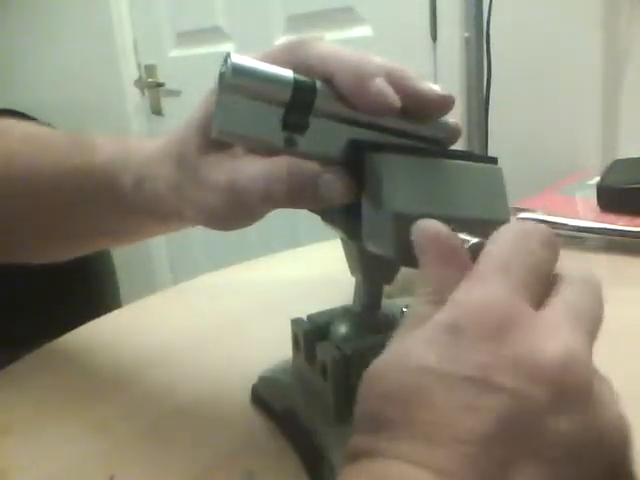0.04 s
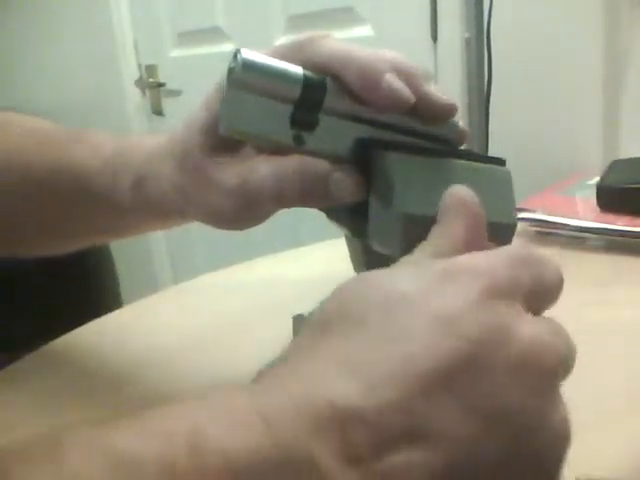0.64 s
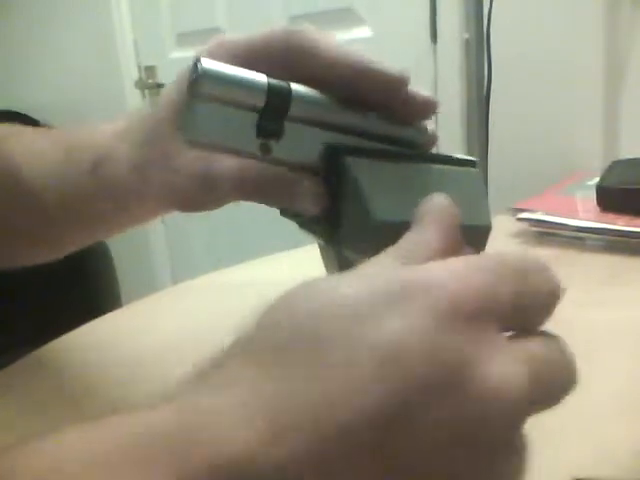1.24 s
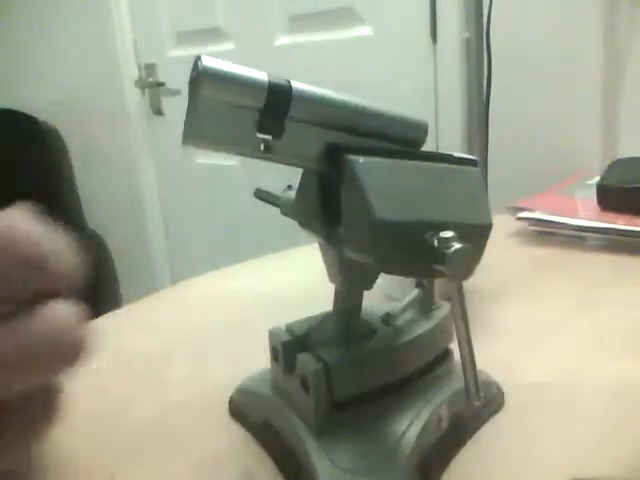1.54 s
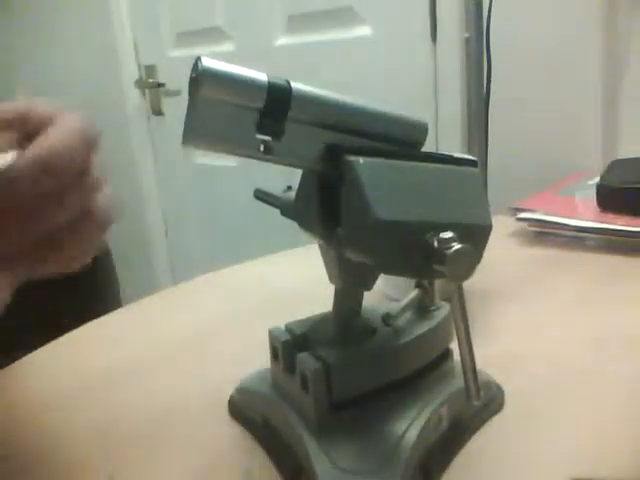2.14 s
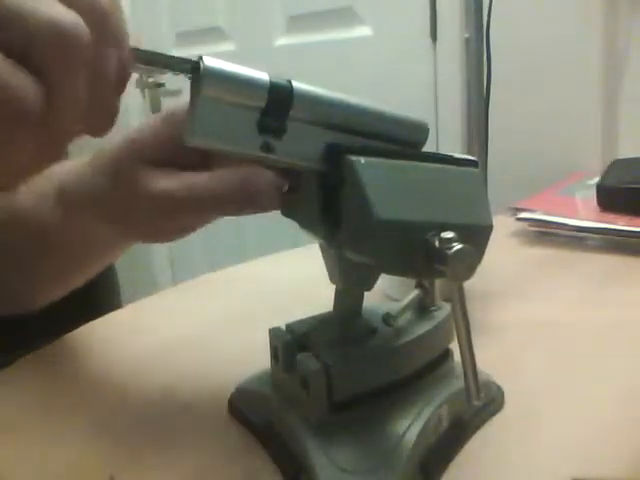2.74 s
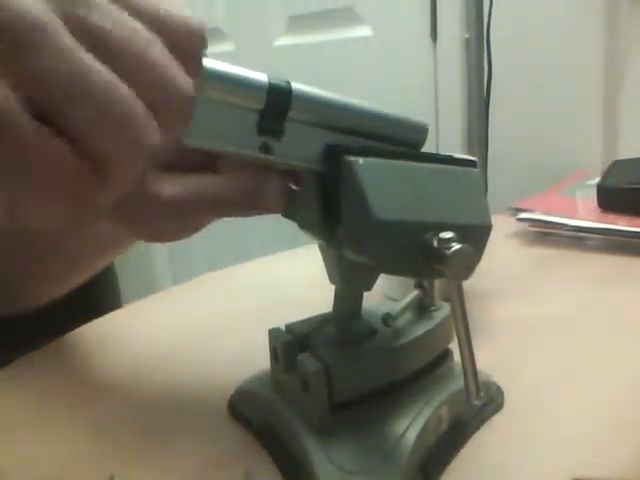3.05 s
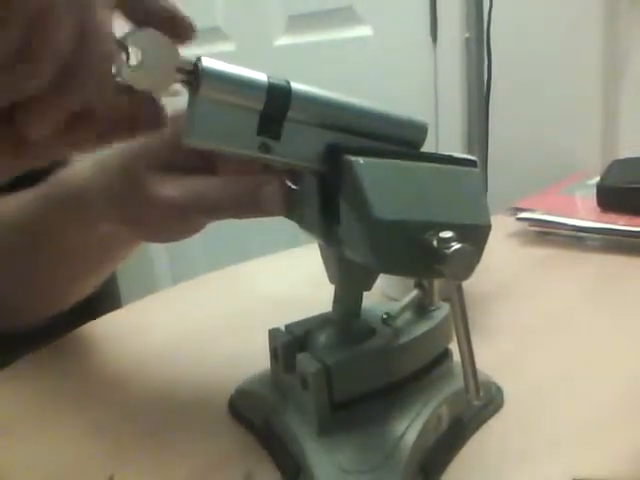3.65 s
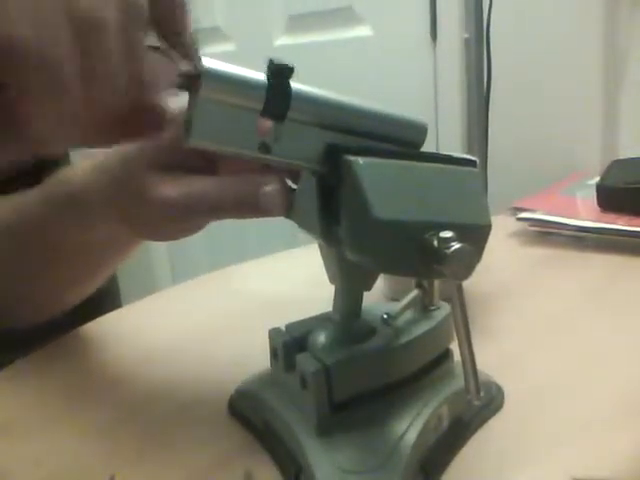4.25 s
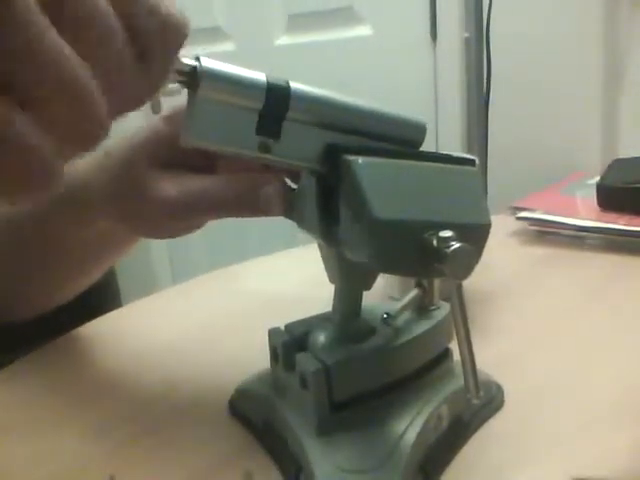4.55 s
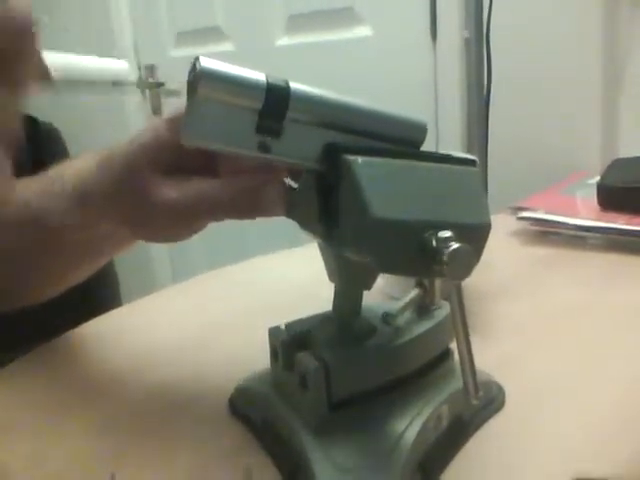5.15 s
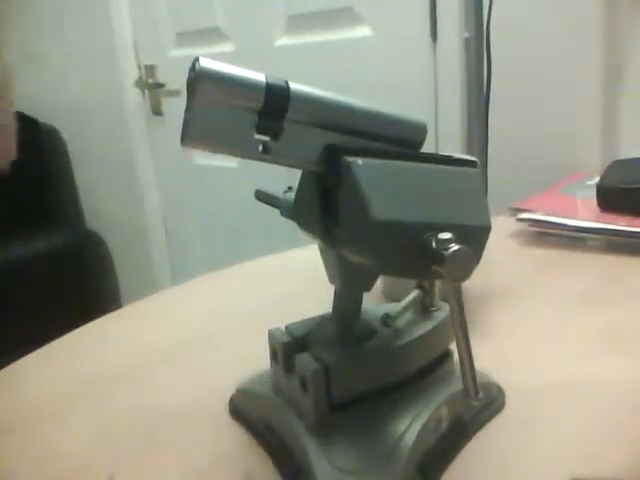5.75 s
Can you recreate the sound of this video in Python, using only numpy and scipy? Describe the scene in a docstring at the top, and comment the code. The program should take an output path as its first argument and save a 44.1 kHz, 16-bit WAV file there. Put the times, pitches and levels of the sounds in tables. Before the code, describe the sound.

A vise screw squeaks twice, a key clicks and turns in a metal lock, then clatters onto a wooden desk.

```python
"""A vise screw rasps faintly, then squeals twice by stick-slip friction as it clamps a cylinder lock.
A key slides in, turns against the pins and is drawn out; the impacts excite the modes of lock and vise.
Dropped on the wooden desk, the key bounces, drums the top and rings in its own modes, and a metal
tool scrapes over the wood. The small, quiet room adds a short reverberation."""
import sys
import numpy as np
from scipy import signal
from scipy.fft import rfft, irfft
from scipy.io import wavfile
from scipy.ndimage import uniform_filter1d

SR = 44100
rng = np.random.default_rng(int(sys.argv[2]) if len(sys.argv) > 2 else 0)


def wav_record(signal):
    """Record a signal, one row per channel, as 16-bit PCM in the file named by sys.argv[1]."""
    frames = np.transpose(np.atleast_2d(signal))
    bounded = np.clip(frames, -1, 1)
    # unit amplitude maps onto the largest positive 16-bit level
    quanta = np.round(bounded * 32767).astype(np.int16)
    wavfile.write(sys.argv[1], SR, quanta)


N = 264996
T = np.arange(N) / SR
IMPACT_T = T[:SR // 3]  # time axis of one impact [s]
TOP_HZ = 15850

# modes of the vise: (frequency [Hz], bandwidth [Hz], gain [dB])
VISE_MODES = [(237.4, 7.3, 0.5), (480, 142, -4), (833, 22, -7.5), (1080, 28, -11), (1575, 184, -8),
              (2330, 200, -7), (2725, 59, -9), (3310, 30, 2), (3860, 340, -8.5)]
# modes of the desk top: (frequency [Hz], bandwidth [Hz], gain [dB])
DESK_MODES = [(262, 25, 0.5), (561, 88, -1.5), (816, 32, 0.5), (1104, 37, 1), (1590, 76, -1.5),
              (1718, 28, -2), (2230, 58, -9), (2540, 160, -6.5), (2830, 120, -3), (2980, 45, -14),
              (3280, 37, -4), (3490, 16, -12), (4310, 32, -7), (4760, 25, -27)]
# modes of the key, some in close pairs: (frequency [Hz])
KEY_MODES_HZ = [5141, 7110, 8137, 8312, 11390, 11435, 12695, 12775, 15570]


def undb(db):
    """Amplitude ratio: a factor of ten for every 20 dB."""
    return 10 ** (np.asarray(db) / 20)


def unit(x):
    """Normalisation to rms 1."""
    return x / np.sqrt(np.mean(x ** 2))


def unit_peak(x, size=256):
    """Normalisation of the loudest few milliseconds to rms 1."""
    return x / np.sqrt(uniform_filter1d(x ** 2, size, mode="constant").max())


def fade(t, t60):
    """Damping: exponential decay by 60 dB in t60 seconds."""
    return np.exp(-np.log(1000) * t / t60)


def add(out, start, x):
    """Superposition of x on out from a start time [s]."""
    i = max(int(start * SR), 0)
    out[i:i + len(x)] += x[:max(N - i, 0)]


def band(x, lo_hz, hi_hz, order=2):
    """Causal band-pass filtering."""
    sos = signal.butter(order, [lo_hz, min(hi_hz, .48 * SR)], "band", fs=SR, output="sos")
    return signal.sosfilt(sos, x)


def colour(x, points):
    """Spectral shaping along points of (frequency [Hz], gain [dB])."""
    hz, db = np.transpose(points)
    bins_hz = np.maximum(np.fft.rfftfreq(len(x), 1 / SR), 1)
    return irfft(rfft(x) * undb(np.interp(np.log(bins_hz), np.log(hz), db)), len(x))


def wobble(rate_hz):
    """Random modulation: low-passed noise of rms 1."""
    size = max(int(SR / rate_hz), 2)
    return unit(uniform_filter1d(uniform_filter1d(rng.standard_normal(N), size), size))


def body(x, modes, direct, scatter_db=0):
    """Modal response: parallel resonators plus a direct share; scatter mimics a varying strike point."""
    weights = undb(scatter_db * rng.standard_normal(len(modes)))
    return direct * x + sum(weight * undb(db) * signal.lfilter(*signal.iirpeak(hz, hz / width, SR), x)
                            for weight, (hz, width, db) in zip(weights, modes))


def contact(t60, rise_s=.00043, spread_db=4.5, grain_samples=32):
    """Impact of rough faces: a decaying burst of uneven micro-impacts."""
    n = len(IMPACT_T)
    sizes = np.repeat(undb(spread_db * rng.standard_normal(n // grain_samples + 1)), grain_samples)[:n]
    return rng.standard_normal(n) * sizes * fade(IMPACT_T, t60) * (1 - np.exp(-IMPACT_T / rise_s))


def grit(n, rate_hz, spread_db):
    """Friction as shot noise: tiny random slips of uneven size."""
    slips = (rng.random(n) < rate_hz / SR) * rng.standard_normal(n)
    return slips * undb(spread_db * np.minimum(rng.exponential(size=n), 4))


def background():
    """Noise floor: room murmur, microphone hiss, electronic whine and, at first, skin on the handle."""
    # spectrum of murmur and hiss: (frequency [Hz], relative density [dB])
    floor_spectrum = [(15, -41), (25, -4.5), (253, -5), (378, -6.5), (421, -5), (762, -12.5), (1140, -12),
                      (5280, -17.5), (12800, -20), (15500, -21.5)]
    hiss = unit(colour(rng.standard_normal(N), floor_spectrum)) * undb(-55.96)
    whine = unit(band(rng.standard_normal(N), 12650, 12750)) * undb(-71)
    skin = unit(band(grit(N, 2500, 1.5), 110, 700, order=1))
    return hiss + whine + skin * undb(np.interp(T, [.5, 1.3, 1.6], [-56, -62, -90]))


def room(x, wet_db=-11, t60=.25, first_echo_s=.008):
    """Reverberation: reflections from close walls merge into a short, dull tail."""
    # spectrum of the tail: (frequency [Hz], gain [dB])
    tail_spectrum = [(60, -10), (250, -1), (1500, 0), (3000, 0), (6000, -5), (16000, -11)]
    t = T[:SR // 2]
    tail = colour(rng.standard_normal(len(t)), tail_spectrum) * fade(t, t60) * (t > first_echo_s)
    return x + undb(wet_db) * signal.fftconvolve(x, tail / np.sqrt(np.sum(tail ** 2)))[:N]


def rocking():
    """Low-frequency impacts: the vise rocks under the hands and its foot bumps the desk."""
    # bumps of the foot: (time [s], relative level [dB])
    bumps = [(2.878, -45), (3.318, -46.5), (3.791, -51), (4.678, -45), (4.823, -49), (4.863, -37.5),
             (4.93, -39.5), (4.988, -44.5)]
    out = np.zeros(N)
    for start, db in bumps:
        add(out, start, unit_peak(band(contact(t60=.11), 45, 200)) * undb(db + 4.5))
    return out


def taps():
    """Band-limited excitation: soft contacts sound only in the midrange."""
    # dull taps: (time [s], relative level [dB])
    touches = [(0.933, -40.5), (1.511, -38), (1.709, -39), (1.892, -46), (3.152, -43), (3.17, -43),
               (3.207, -38), (4.884, -32), (5.024, -25.5), (5.134, -39.5), (5.237, -35.5)]
    out = np.zeros(N)
    for start, db in touches:
        add(out, start, unit_peak(band(contact(t60=.011), 1000, 2000)) * undb(db - 7.5))
    return out


def rubbing():
    """Sliding friction of fingers and key on metal drives the modes of the vise."""
    # rubs: (start [s], duration [s], level [dB])
    rubs = [(.85, 0.065, -57), (1.022, 0.18, -51.8), (1.352, 0.042, -53), (2.49, 0.074, -56.5),
            (2.796, .14, -45), (3.131, .054, -50), (3.589, 0.13, -55), (3.727, 0.11, -49),
            (3.866, 0.1, -45), (4.348, .21, -51.5), (4.647, 0.025, -42)]
    # spectral envelope of a rub: (frequency [Hz], gain [dB])
    rub_spectrum = [(40, 0), (200, 4), (500, -3.5), (1700, -0.5), (2800, -3), (4500, -11), (9000, -13.5),
                    (16000, -26)]
    out = np.zeros(N)
    for start, duration, db in rubs:
        n = int(duration * SR)
        rub = unit(colour(body(grit(n, 3500, .46), VISE_MODES, direct=.57), rub_spectrum))
        add(out, start, rub * signal.windows.tukey(n, .4) * undb(db))
    return out


def dragged_tool(attack_s=.019, t60=1.2):
    """Sliding friction of metal on wood drives the desk's modes; each shove fades as it slows."""
    # shoves: (start [s], level [dB])
    shoves = [(5.645, -28.5), (5.911, -33)]
    # spectral envelope of the scrape: (frequency [Hz], gain [dB])
    scrape_spectrum = [(40, -54), (120, -0.5), (250, -2), (600, 0), (1600, -0.5), (2900, -1), (4000, -14.5),
                       (6500, -19), (16000, -39)]
    scrape = unit(colour(body(grit(N, 5000, 1), DESK_MODES, direct=.47), scrape_spectrum))
    envelope = np.zeros(N)
    for start, db in shoves:
        add(envelope, start, undb(db) * np.minimum(T / attack_s, 1) * fade(T, t60))
    return scrape * envelope


def screw_groan(groan_db=-56, rasp_db=-58):
    """Friction in the freely turning thread: a faint harmonic groan and a rasp of falling pitch."""
    slip_hz = np.interp(T, [.3, .52], [116, 126]) * (1 + .04 * wobble(14))
    phase = 2 * np.pi * np.cumsum(slip_hz) / SR
    groan = unit(sum(np.sin(k * phase) * wobble(24) for k in range(2, 5))) * undb(groan_db)
    rasp_hz = np.interp(T, [.15, .45], [3800, 3000])
    rasp = unit(wobble(620) * np.sin(2 * np.pi * np.cumsum(rasp_hz) / SR)) * undb(rasp_db)
    return groan * np.interp(T, [.5, .54], [1, 0]) + rasp * np.interp(T, [.1, .42, .47], [0, 1, 0])


def stick_slip(start, fastest, stall, end, top_hz, db, attack_s, rough):
    """Stick-slip rate [Hz], gain and roughness: a turn spins up, sags to the screw's pitch and stalls."""
    sing_hz, stall_hz = 2357, 800
    sag_s, release_s = .028, .0024
    spin_up_s, braking_s = .37 * max(fastest - start, 1 / SR), .62 * (end - stall)
    spin_up = 1 - np.exp(-np.maximum(T - start, 0) / spin_up_s)
    sag = np.exp(-(np.maximum(T - fastest, 0) / sag_s) ** 2)
    braking = np.exp(-(np.maximum(T - stall, 0) / braking_s) ** 2)
    speed = spin_up * braking
    hz = stall_hz + (sing_hz + (top_hz - sing_hz) * sag - stall_hz) * speed
    hz *= 1 + .14 * rough * wobble(108)
    onset_db = -31 * np.clip(1 - (T - start) / attack_s, 0, 1) ** 2
    slowing_db = -4 * (1 - speed)
    gate = (T > start) * np.exp(-np.maximum(T - end, 0) / release_s)
    return hz, undb(db + onset_db + slowing_db) * gate, np.clip(rough + .7 * (1 - speed), 0, 1)


def screw_squeal(jitter=.15, chatter_db=-4):
    """Self-excited oscillation: the dry screw sings while it slips fast and chatters as it slows."""
    # turns: (start [s], fastest [s], stall [s], end [s], top pitch [Hz], level [dB], attack [s],
    # base roughness [0-1])
    turns = [(0.433, 0.439, .511, .531, 2900, -28, 0.058, .06),
             (.57, .614, .654, .68, 2864, -28, 0.0024, .19)]
    # the vise radiates best near 2.4 kHz: (frequency [Hz], gain [dB])
    radiation = np.transpose([(800, -4.5), (1900, -3), (2370, 3.5), (2800, -3.5), (4700, -13),
                              (5400, -11.5), (7100, -26.5), (8000, -23), (11000, -38)])
    out = np.zeros(N)
    for turn in turns:
        hz, gain, rough = stick_slip(*turn)
        phase = 2 * np.pi * np.cumsum(hz * (1 + jitter * rough * wobble(750))) / SR
        tone = sum(np.sin(k * phase) * (k * hz < TOP_HZ) * undb(np.interp(k * hz, *radiation))
                   for k in range(1, 7))
        chatter = unit(band(body(grit(N, 4000, 1), VISE_MODES, direct=.49), 1270, 5700, order=3))
        flutter = undb(10 * np.minimum(rough, .3) * wobble(360))
        out += gain * (np.sqrt(2) * tone * (1 - rough / 2) * flutter + undb(chatter_db) * rough * chatter)
    return out


def click(bright_db, load_db):
    """Structure-borne sound: an impact ticks in the lock, clacks in the vise and thuds into the desk."""
    # modes of the lock cylinder: (frequency [Hz], bandwidth [Hz], gain [dB])
    cylinder_modes = [(3750, 400, 1), (5136, 90, -3), (7456, 90, -4), (8651, 80, 5), (11590, 140, 3)]
    clack = band(body(contact(.017, rise_s=.00042), VISE_MODES, direct=.25, scatter_db=7.5), 880, 2770)
    thud = band(body(contact(.04), VISE_MODES, direct=.52), 86, 860)
    tick = band(body(contact(.024, rise_s=.0086), cylinder_modes, direct=1), 3300, 8800)
    sizzle = band(body(contact(.015, rise_s=.0016), cylinder_modes, direct=.97), 7650, 14000)
    thud_db = -23.5 - .27 * bright_db + load_db  # a softer contact pushes longer and thuds more
    treble = unit_peak(tick) * undb(-10) + unit_peak(sizzle) * undb(-7.5)
    return unit_peak(clack) * undb(-9.5) + unit_peak(thud) * undb(thud_db) + treble * undb(bright_db)


def lock(tug_start=4.4, tug_end=5.05, tug_db=8.5):
    """Impacts of jaws, key and pins; tugging the key out loads the vise, so they thud harder."""
    # clicks: (time [s], level [dB], brightness [dB])
    clicks = [(.139, -42, -15), (.387, -41, -22), (.568, -18.5, -15.5), (1.258, -33, -3),
              (1.264, -27.5, -4.5), (1.271, -28.5, -1), (1.295, -33, -16), (2.549, -32.5, -6),
              (2.835, -37, 1), (2.861, -32, -1.5), (2.871, -27, -9.5), (2.878, -25.5, -9), (2.897, -30, 2),
              (2.914, -25.5, -14), (3.272, -26, -25), (3.296, -28.5, -10), (3.309, -28, -1.5),
              (3.314, -18, -4.5), (3.385, -33, -32), (3.586, -34, -12), (3.712, -31.5, -11),
              (3.736, -30.5, 3), (3.756, -26.5, 1.5), (3.781, -33, -4), (4.322, -30, -13),
              (4.35, -23.5, -10), (4.359, -29.5, -6.5), (4.462, -32, -12), (4.504, -33, -25),
              (4.535, -32.5, -20), (4.62, -33.5, -8.5), (4.655, -28.5, -32), (4.663, -26, -18),
              (4.667, -27, -1.5), (4.68, -29.5, -1.5), (4.772, -20, -13), (4.815, -27.5, 2.5),
              (4.819, -17, -5), (4.921, -27, -19), (4.926, -27, -5.5), (4.943, -33.5, -10),
              (4.956, -36, -1.5), (4.976, -32.5, -23), (4.999, -38.5, -3)]
    out = np.zeros(N)
    for start, db, bright_db in clicks:
        load_db = tug_db * (tug_start < start < tug_end)
        add(out, start, click(bright_db, load_db) * undb(db))
    return out


def key_ring(mode_db, t60, scatter_db=0):
    """Free vibration of the key: a sum of damped sinusoids with random phases."""
    count = len(KEY_MODES_HZ)
    gains = undb(np.array(mode_db) + scatter_db * rng.standard_normal(count))
    phase = 2 * np.pi * (np.outer(KEY_MODES_HZ, IMPACT_T) + rng.random((count, 1)))
    return unit_peak(gains @ np.sin(phase) * fade(IMPACT_T, t60))


def held_key():
    """Damped vibration: the key meets the lock, muted by fingers; some touches ring bright, some dull."""
    # touches: (time [s], level [dB], decay time t60 [s], spectral tilt [dB/octave])
    pings = [(2.055, -51.5, 0.061, 0), (3.734, -42, 0.014, -1), (3.935, -48.5, 0.084, -1),
             (3.966, -43, 0.11, -5.5), (4.117, -33, 0.08, 0), (4.268, -40.5, 0.043, -5),
             (4.289, -42, 0.018, -11)]
    # each mode of the held key: (relative level [dB])
    held_db = [-12, -11, -20, -10, -1, -2, -10, -3, -2]
    out = np.zeros(N)
    for start, db, t60, tilt_db in pings:
        ring = key_ring(held_db + tilt_db * np.log2(KEY_MODES_HZ), t60)
        touch = unit_peak(band(contact(.033), 200, 18500))
        add(out, start, (ring + undb(-5.5) * touch) * undb(db))
    return out


def dropped_key(key_t60=.08, rattle_db=-26):
    """Inelastic collisions: each bounce excites the modes of desk and key, and tiny hops add a rattle."""
    # bounces: (time [s], level [dB], brightness [dB])
    bounces = [(5.635, -6, .5), (5.639, -11.5, -4), (5.67, -15.5, -0.5), (5.679, -9.5, -9),
               (5.701, -21.5, 5.5), (5.776, -10.5, -25), (5.894, -15.5, -31), (5.989, -21.5, 3),
               (5.997, -19, 0)]
    # each mode of the free key: (relative level [dB])
    free_db = [-22, -12, -9, -3, -2, -1, -5, -8, -9]
    out = np.zeros(N)
    for start, db, bright_db in bounces:
        clack = unit_peak(band(body(contact(.046), DESK_MODES, direct=.58), 796, 2920, order=3))
        thud = unit_peak(band(body(contact(.032), DESK_MODES, direct=.21), 187, 620, order=4))
        tick = unit_peak(band(body(contact(.051), DESK_MODES, direct=.12), 3280, 6100))
        ring = key_ring(free_db, key_t60) + unit_peak(band(contact(.026), 7600, 21400))
        treble = undb(bright_db) * (tick * undb(-8.5) + ring * undb(-12.5))
        thud_db = -13.5 + 1.32 * db  # light bounces drum the desk less than in proportion
        add(out, start, thud * undb(thud_db) + undb(db) * (clack * undb(-9) + treble))
    hops = grit(N, 900, 1) * np.interp(T, [5.65, 5.68, 5.738, 5.752], [0, 1, 1, 0])
    ringing = unit_peak(signal.fftconvolve(hops, key_ring(free_db, key_t60))[:N])
    clatter = unit_peak(band(body(hops, DESK_MODES, direct=.28), 1130, 7300))
    return out + undb(rattle_db) * (ringing + undb(3.5) * clatter)


def scene():
    """Superposition at one microphone: the sources, their reverberation and the noise floor."""
    at_vise = screw_squeal() + screw_groan() + lock() + taps() + rocking() + held_key()
    sources = at_vise + dropped_key() + rubbing() + dragged_tool()
    return (room(sources) + background())[None]


def record(dry):
    """Clipping at full scale, then band-limiting by a steep low-pass."""
    low_pass = signal.ellip(10, .2, 70, TOP_HZ, fs=SR, output="sos")
    return signal.sosfilt(low_pass, np.clip(dry, -1, 1))


dry = scene()
out = record(dry)
wav_record(out)
```